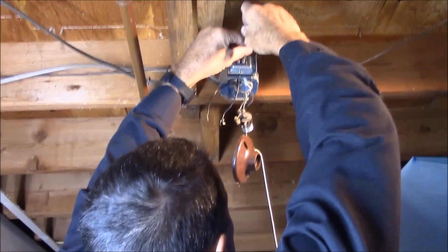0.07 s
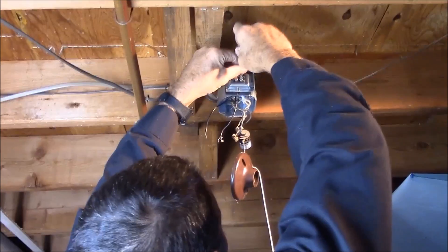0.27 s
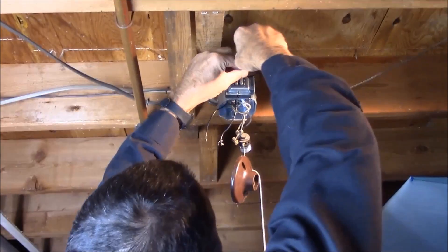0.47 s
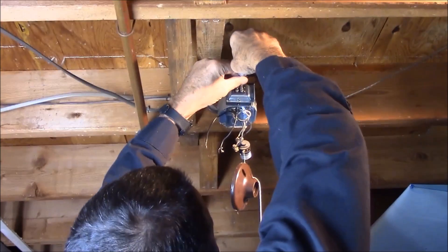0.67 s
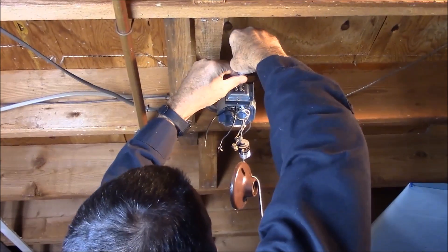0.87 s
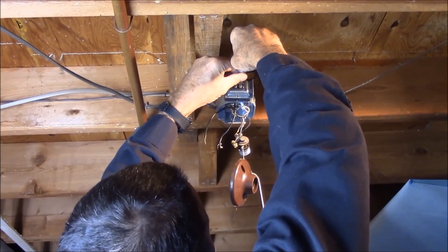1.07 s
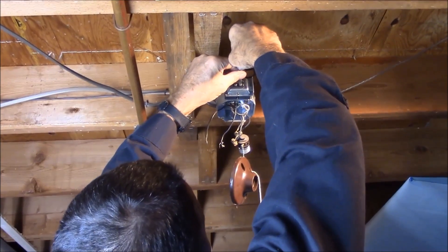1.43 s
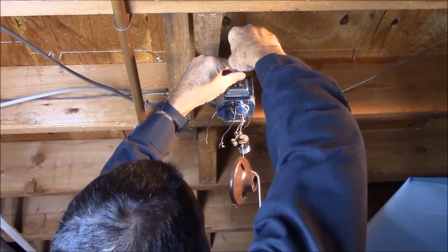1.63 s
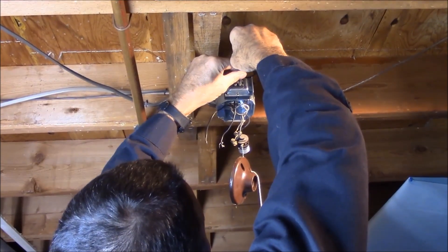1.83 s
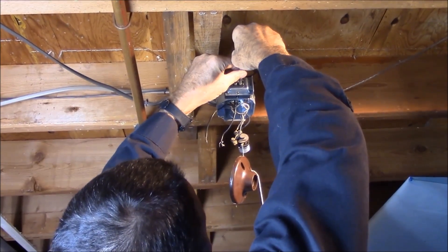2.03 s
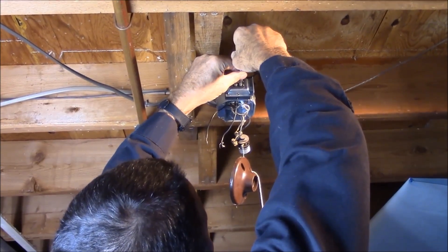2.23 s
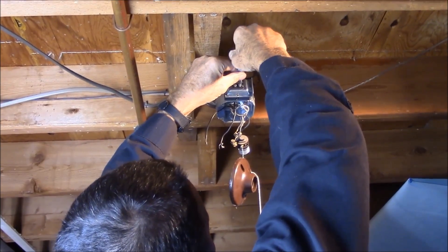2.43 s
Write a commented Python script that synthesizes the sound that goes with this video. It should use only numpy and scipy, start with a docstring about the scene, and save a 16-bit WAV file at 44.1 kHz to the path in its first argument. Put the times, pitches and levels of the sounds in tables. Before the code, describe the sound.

A sharp metal clink among small ticks and knocks as hands work on hardware indoors.

```python
"""Steel snapping home

Close up in a small, dry room with a wooden ceiling, hands work on metal hardware straight ahead of the
microphone. Fingers scrape, loose parts tick and clack, then a steel part slips, bites with a sharp
clink and sings briefly. The mounting gives dull knocks; sleeves rustle over the room's low rumble."""
import sys
import numpy as np
from scipy import signal
from scipy.fft import rfft, irfft, next_fast_len
from scipy.io import wavfile
from scipy.ndimage import map_coordinates

SR = 44100
rng = np.random.default_rng(int(sys.argv[2]) if len(sys.argv) > 2 else 0)


def digitize_waveform(pressure):
    """Quantize a signal to 16-bit integers and store it at the path in sys.argv[1].

    Rows of a 2-D input are taken as channels; values are limited to [-1, 1].
    """
    field = np.atleast_2d(pressure).T
    bounded = np.clip(field, -1, 1)
    quanta = np.round(bounded * 32767).astype(np.int16)
    wavfile.write(sys.argv[1], SR, quanta)


N = 110250


def amp(db):
    """Decibels to gain."""
    return 10 ** (np.asarray(db) / 20)


def filtered(x, response):
    """Scale the spectrum of x by a function of frequency."""
    size = next_fast_len(N + 8192)
    return irfft(rfft(x, size) * response(np.fft.rfftfreq(size, 1 / SR)), size)[..., :N]


def colour(x, points):
    """Shape x by (Hz, dB) points, to rms 1."""
    freqs, db = np.transpose(points)
    shaped = filtered(x, lambda hz: amp(np.interp(np.log(hz + 1), np.log(freqs), db)))
    return shaped / np.sqrt(np.mean(shaped ** 2) + 1e-20)


def noise(points):
    """Fresh coloured noise of rms 1."""
    return colour(rng.standard_normal(N), points)


def since(start):
    """Seconds since start, zero before it."""
    return np.maximum(np.arange(N) / SR - start, 0)


def envelope(t, attack, t60, hold=0):
    """Attack, hold and exponential release, all in seconds."""
    return (1 - np.exp(-t / attack)) * amp(-60 * np.maximum(t - hold, 0) / t60)


def ring(modes, t, attack):
    """Decaying modes, their level and phase a little different at each blow."""
    return sum(amp(db + rng.normal()) * envelope(t, attack, t60)
               * np.sin(2 * np.pi * (hz * t + rng.random())) for hz, db, t60 in modes)


# The room's air, ahead and to the sides. Each row: frequency in Hz, relative density in dB.
AIR_AHEAD = [(15, -11.5), (30, 0.5), (68, -0.5), (110, -14), (200, -16), (400, -17.5), (800, -21.5),
             (2000, -25.5), (6000, -28.5), (15500, -35)]
AIR_SIDES = [(25, -7.5), (300, -6), (1200, -8.5), (6000, -11.5), (15500, -17)]
def room_tone():
    """A steady low rumble ahead and a fainter diffuse wash, as mid and side."""
    return amp(-54.5) * noise(AIR_AHEAD), amp(-64.5) * noise(AIR_SIDES)


# Sleeves near the microphone. Each row: time in seconds, level in dB.
RUSTLE_LEVELS = [(0, -50.5), (.28, -48), (0.441, -43.5), (0.502, -52.5), (.58, -45.5), (.64, -52.5),
                 (.8, -57), (.9, -51), (1.05, -54.5), (1.3, -61.5), (1.8, -58), (1.93, -63.5),
                 (2.15, -58.5), (2.5, -55.5)]
# Their muffled cloth. Each row: frequency in Hz, relative density in dB.
CLOTH_SPECTRUM = [(25, -8), (70, 0.5), (140, 0.5), (280, -3), (450, -9.5), (800, -22), (2500, -35),
                  (12000, -46)]
# Soft bumps of the hands at work. Each row: start in seconds, pitch in Hz, level in dB.
SOFT_BUMPS = [(0.536, 64, -29), (.571, 143, -33.5)]
def handling():
    """Sleeves rustle as the arms move, with two soft bumps."""
    out = amp(np.interp(since(0), *np.transpose(RUSTLE_LEVELS))) * noise(CLOTH_SPECTRUM)
    for start, hz, db in SOFT_BUMPS:
        t = since(start)
        out += amp(db) * envelope(t, attack=0.004, t60=0.1) * np.sin(2 * np.pi * hz * t)
    return out


# Fingers on the metal. Each row: start and length in seconds, grit and housing levels in dB.
STROKES = [(.01, 0.072, -56, -63.5), (0.08, 0.036, -54, -69), (0.173, 0.042, -61, -49),
           (.488, 0.032, -56.5, -47.5), (0.809, 0.023, -53.5, -60), (1.58, 0.067, -57.5, -71),
           (1.669, 0.027, -56, -65), (1.697, 0.044, -56.5, -54), (1.76, 0.029, -51, -67),
           (1.851, 0.019, -54.5, -63), (2.007, 0.056, -54.5, -65), (2.466, 0.023, -55, -58)]
# The grit and the housing under it. Each row: frequency in Hz, relative density in dB.
GRIT_SPECTRUM = [(300, -7), (900, 7.5), (2200, 0.5), (4200, -1.5), (6600, -0.5), (8500, -5.5),
                 (15500, -13.5)]
HOUSING_SPECTRUM = [(200, -32), (550, 3), (800, -13.5), (1250, -4), (1550, -7.5), (1850, -3), (2400, -11),
                    (3000, -13), (4500, -14), (12000, -47)]
def scrapes(grains_per_s=900, grain_db=4.5):
    """Short strokes of gritty friction; the firmer ones make the housing resonate."""
    t = since(0)
    roughness = map_coordinates(rng.standard_normal(N), [t * grains_per_s], order=1)
    grit = colour(amp(grain_db * roughness) * rng.standard_normal(N), GRIT_SPECTRUM)
    housing = noise(HOUSING_SPECTRUM)
    out = np.zeros(N)
    for start, length, grit_db, housing_db in STROKES:
        progress = np.clip((t - start) / length, 0, 1)
        pressure = np.sqrt(np.abs(np.sin(np.pi * progress)))
        out += pressure * (amp(grit_db) * grit + amp(housing_db) * housing)
    return out


# Small sharp ticks at the hardware. Each row: start in seconds, level in dB.
TICK_HITS = [(0.022, -48), (0.031, -47), (0.054, -51), (0.0738, -45), (0.0992, -43.5), (0.142, -40.5),
             (0.498, -44), (0.819, -47), (0.827, -43), (.9893, -31.5), (1.641, -38.5), (1.8377, -46),
             (1.862, -55), (2.0197, -46.5), (2.043, -37), (2.092, -45.5), (2.414, -46.5), (2.4412, -49),
             (2.4782, -42.5), (2.481, -43)]
# Their bright colour from close by. Each row: frequency in Hz, relative density in dB.
TICK_SPECTRUM = [(100, -32), (400, -10), (1200, -5.5), (3000, -0.5), (4500, -5), (6300, 4), (8500, -9.5),
                 (15500, -23)]
def ticks():
    """Tiny hard contacts with hardly any ring."""
    contacts = sum(amp(db) * envelope(since(start), attack=0.0001, t60=0.011) for start, db in TICK_HITS)
    bursts = contacts * rng.standard_normal(N)
    return np.std(bursts) * colour(bursts, TICK_SPECTRUM)


# Loose parts, straight ahead. Each row: start in seconds, level in dB, t60 of the noise in seconds.
CLACK_HITS = [(.1505, -38.5, 0.11), (.296, -47.5, 0.089), (0.4962, -63, 0.2), (1.6415, -40, 0.1)]
# The noise of their contact. Each row: frequency in Hz, relative density in dB.
CLACK_SPECTRUM = [(100, -22), (300, -19.5), (550, 13), (750, -8.5), (1100, 14), (1500, 2), (2000, -2),
                  (4200, -6.5), (6800, -9), (8800, -9.5), (10500, -27), (15500, -50.5)]
# Their ring. Each row: frequency in Hz, relative level in dB, t60 in seconds.
LOOSE_MODES = [(943, 2, 0.039), (1212, -5.5, 0.024), (1996, -0.5, 0.053), (2917, 2, 0.03),
               (3320, -18.5, 0.028)]
def clacks():
    """Loose parts bump together and ring briefly."""
    out = np.zeros(N)
    for start, db, t60 in CLACK_HITS:
        t = since(start)
        contact = envelope(t, attack=0.002, t60=t60) * noise(CLACK_SPECTRUM)
        out += amp(db) * (contact + amp(-1) * ring(LOOSE_MODES, t, attack=0.00067))
    return out


CLINK_S = 0.2215
# Steel chatter and housing rattle, close up. Each row: frequency in Hz, relative density in dB.
CHATTER_SPECTRUM = [(150, -15.5), (500, -8), (770, -22), (1000, -8), (1400, -24.5), (2050, -5),
                    (2500, -11.5), (3000, -13), (4300, -18), (5900, -4), (6700, -6), (7350, 1.5),
                    (9300, -13.5), (12400, -10), (13400, -25), (15500, -25)]
RATTLE_SPECTRUM = [(150, -32), (500, -1), (750, 0), (1100, 0.5), (1600, -1), (2000, -4), (2400, -13),
                   (3100, 2.5), (4200, -5), (6000, -0.5), (7400, -12), (9300, -22), (12000, -4),
                   (13400, -16), (15500, -27)]
def clink(slip_s=0.0055):
    """Steel starts to slip, chatters for a few milliseconds as it bites, and the housing rattles."""
    t = since(CLINK_S)
    slip = amp(-9) * np.clip(since(CLINK_S - slip_s) / slip_s, 0, 1) ** 2 * (t == 0)
    bite = envelope(t, attack=0.00051, t60=0.041, hold=0.0039)
    chatter = amp(-15.5) * (slip + bite) * noise(CHATTER_SPECTRUM)
    rattle = amp(-29.5) * envelope(t, attack=0.006, t60=0.15) * noise(RATTLE_SPECTRUM)
    return chatter + rattle


# The steel ringing at the same spot. Each row: frequency in Hz, level in dB, t60 in seconds.
STEEL_MODES = [(973, -30, .1), (2030, -36, .12), (2467, -40, .1), (2971, -29, .13), (3385, -32, .11),
               (5013, -32, .11), (7308, -21, .075), (7765, -32, .09), (8687, -37, .11), (10808, -33, .13),
               (11706, -32, .15), (12510, -23.5, .09), (14468, -24, .085)]
def singing_steel(tone_hz=5955, attack_s=0.0026, t60=0.11):
    """The struck steel's modes die quickly, while one clear tone holds, then is damped ever faster."""
    t = since(CLINK_S)
    tone_db = -23 - 60 * (t / t60) ** 3.1
    tone = (1 - np.exp(-t / attack_s)) * amp(tone_db) * np.sin(2 * np.pi * tone_hz * t)
    return ring(STEEL_MODES, t, attack=0.0013) + tone


# Knocks at the mounting. Each row: start in seconds, level in dB, contact time in seconds,
# pitch factor, level of the ping in dB.
KNOCK_HITS = [(0.2224, -39, 0.0003, 0.99, -34), (0.99, -33, 0.00017, 1.003, -37),
              (1.589, -39, .0001, 1.03, -49.5), (1.622, -50, 0.00059, 1.06, -60),
              (1.645, -47.5, 0.00018, .99, -64), (1.778, -38.5, 0.00073, 1, -61),
              (1.8409, -45, 0.00049, 1.004, -67), (2.1231, -41, 0.00085, 0.963, -52),
              (2.351, -42.5, 0.00078, 0.98, -55.5)]
# The ping of steel touching steel. Each row: frequency in Hz, relative level in dB, t60 in seconds.
PING_MODES = [(3950, -9, .015), (5680, -4, 0.023), (6110, -4, 0.023), (6230, 1.5, 0.0092)]
# The mounting's modes. Each row: frequency in Hz, relative level in dB, t60 and delay in seconds.
MOUNT_MODES = [(345, -5, 0.045, 0.019), (431, -3.5, 0.11, .007), (590, 8.5, 0.047, 0.0034),
               (955, 7, 0.031, 0), (1150, -11, .045, 0.003), (1663, -13, 0.04, 0.0035)]
def knocks(swell_cycles=0.87):
    """A small ping, then the mounting rings, sinking in pitch as its low bending waves arrive last."""
    out = np.zeros(N)
    for start, knock_db, contact_s, pitch, ping_db in KNOCK_HITS:
        out += amp(ping_db) * ring(PING_MODES, since(start), attack=0.000098)
        for hz, db, t60, delay in MOUNT_MODES:
            t = since(start + delay)
            gain = amp(knock_db + db) / (1 + (2 * hz * contact_s) ** 4)  # longer contact, duller knock
            out += gain * envelope(t, swell_cycles / hz, t60) * np.sin(2 * np.pi * pitch * hz * t)
    return out


def room(x):
    """The short diffuse answer of the joists and boards overhead."""
    tail = rng.standard_normal(N) * envelope(since(0.003), attack=0.0025, t60=0.13)
    return signal.fftconvolve(x, tail / np.linalg.norm(tail))[:N]


def scene():
    """The work is straight ahead of the microphone; only a little room sound spreads to the sides."""
    air_mid, air_side = room_tone()
    work = scrapes() + ticks() + clacks() + clink() + knocks()
    mid = air_mid + handling() + work + singing_steel() + amp(-10) * room(work)
    side = air_side + amp(-25) * room(mid)
    return np.array([mid + side, mid - side])


def record(dry, top_hz=15800):
    """The camera keeps nothing above its band limit."""
    return filtered(dry, lambda hz: hz < top_hz)


dry = scene()
out = record(dry)
digitize_waveform(out)
```